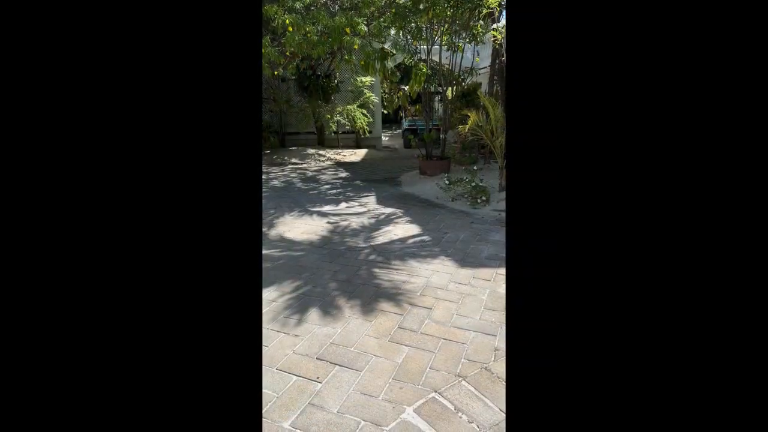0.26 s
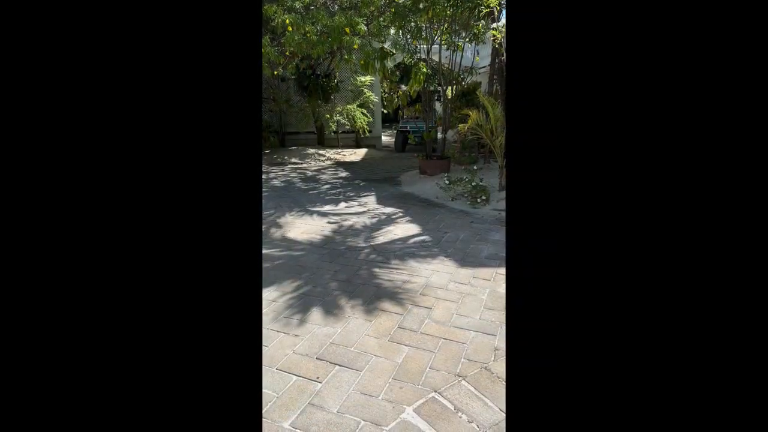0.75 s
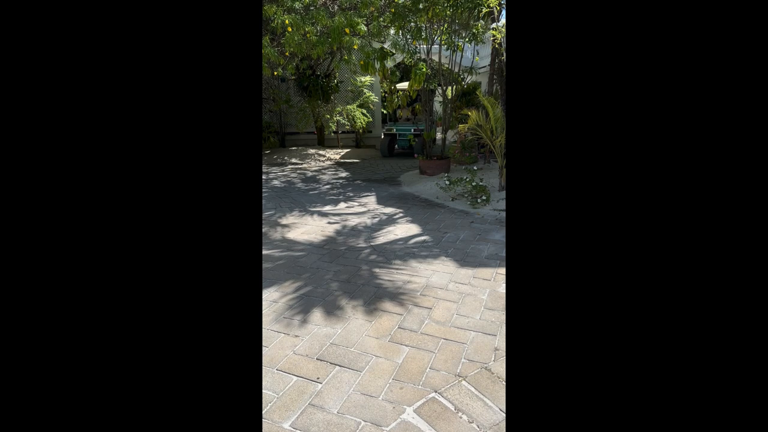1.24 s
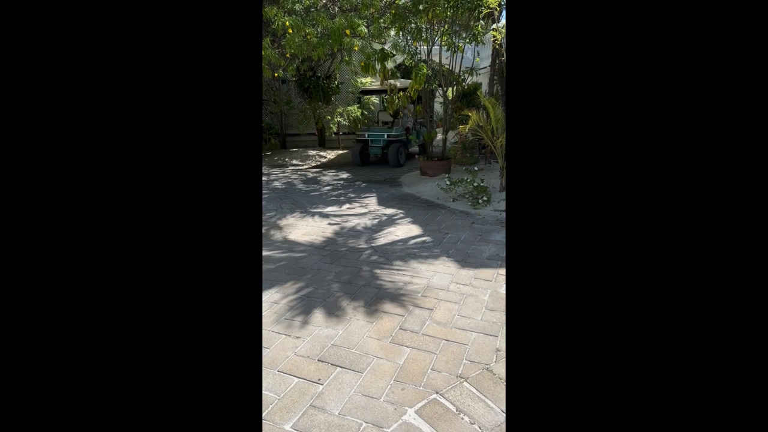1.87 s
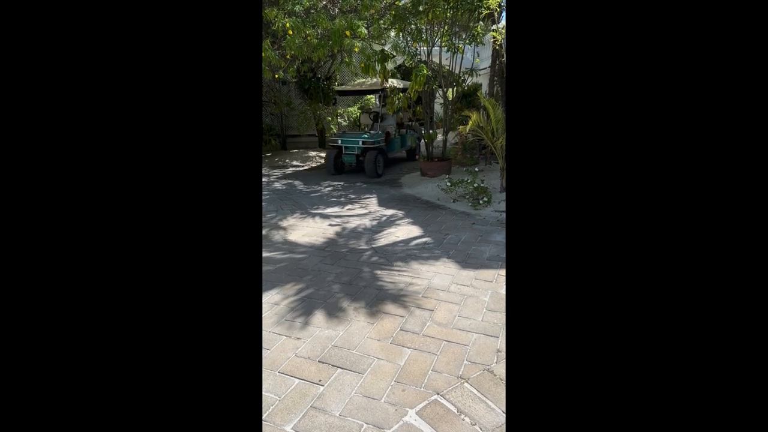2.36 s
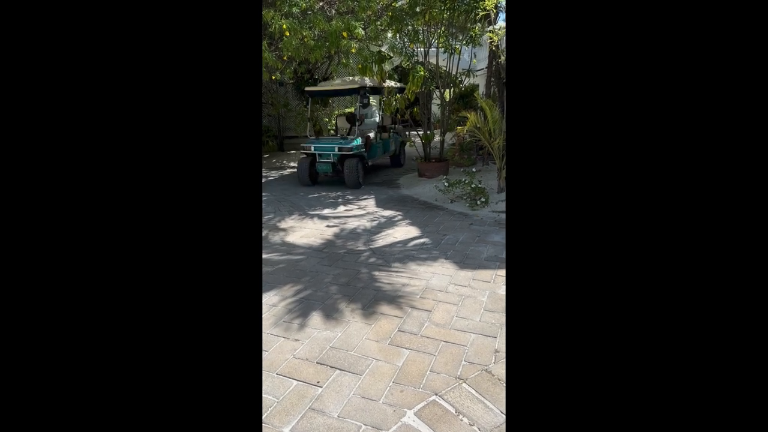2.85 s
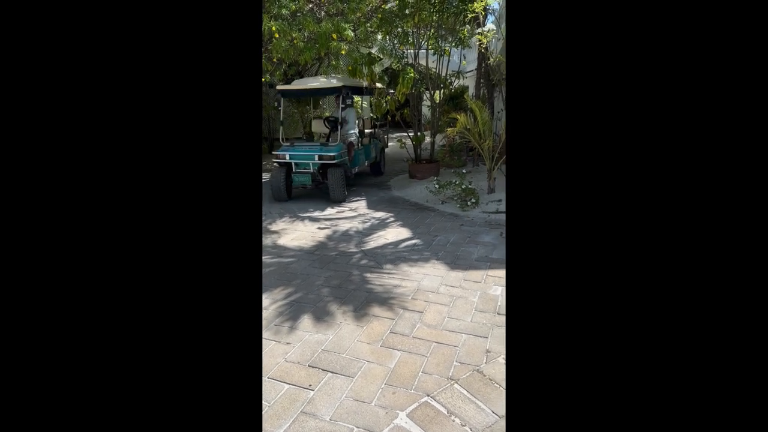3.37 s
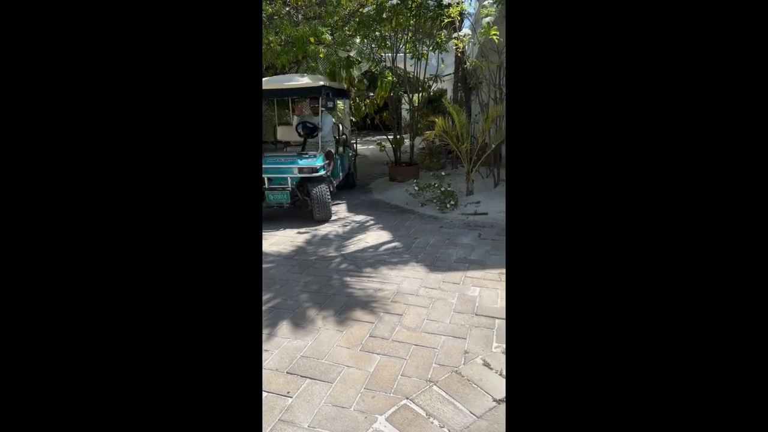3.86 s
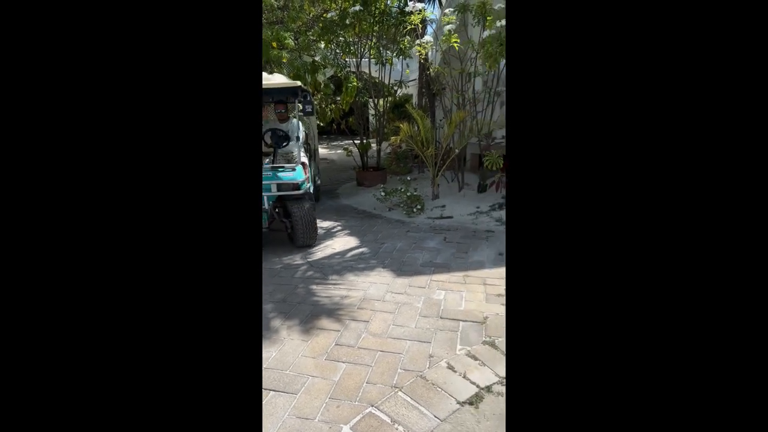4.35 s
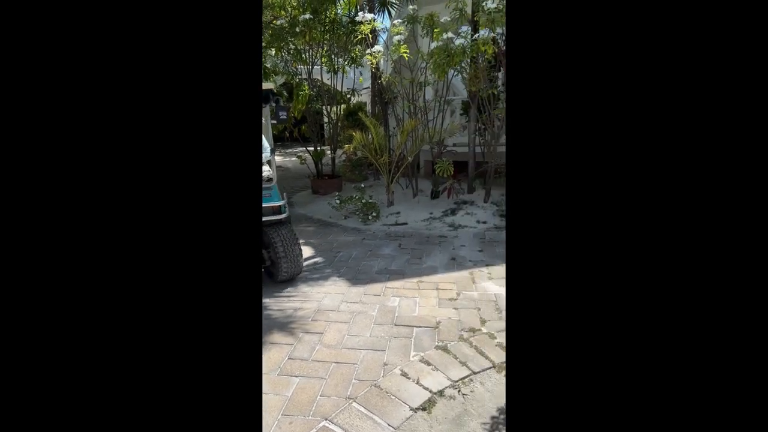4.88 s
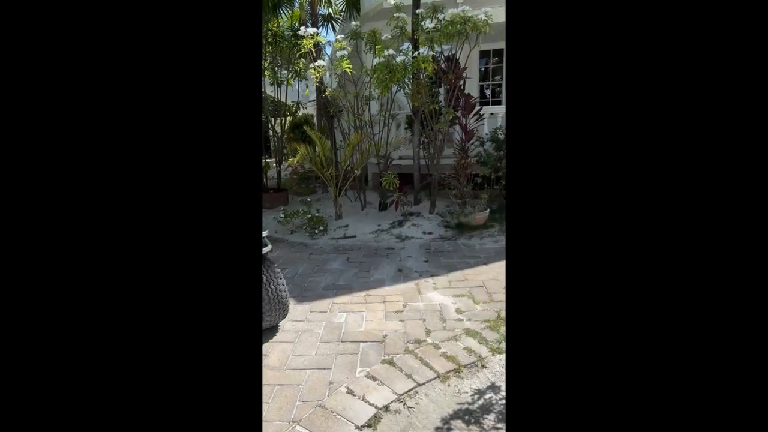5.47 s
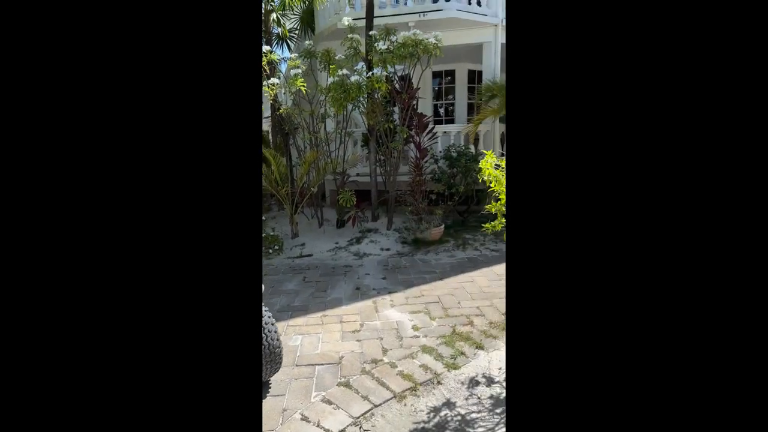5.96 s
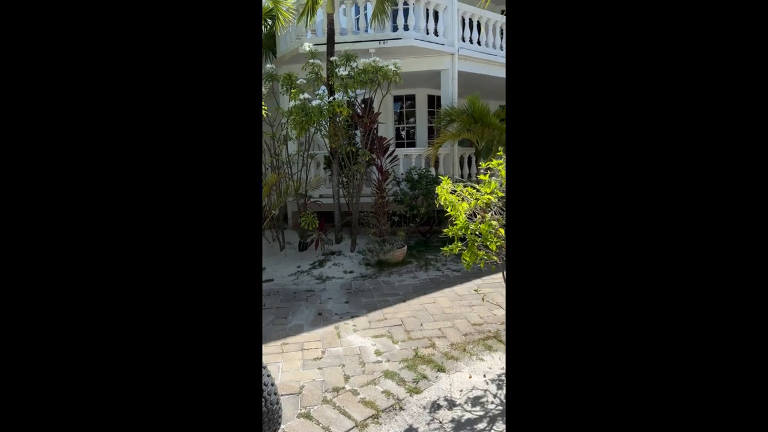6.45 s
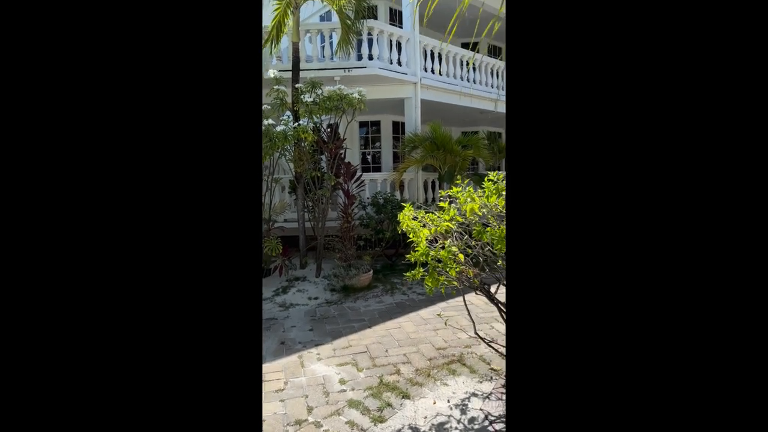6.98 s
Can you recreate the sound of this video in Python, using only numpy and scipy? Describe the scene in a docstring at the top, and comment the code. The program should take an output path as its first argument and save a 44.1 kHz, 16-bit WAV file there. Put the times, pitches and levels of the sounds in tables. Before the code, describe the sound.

A small one-cylinder petrol cart putters up over paving, passes close on the left, then slows to a lumpy, clattering chug as wind buffets the microphone.

```python
"""Petrol cart passing and slowing

A small cart with a one-cylinder petrol engine rolls up over paving, passes close on the left and slows down.
Each engine cycle rings exhaust modes as a thump, then shapes noise into a rasping puff of gas and clatter.
Struck modes give valves, cylinder head and panels; coloured noise gives the whirr of tyres and fan.
A belt whistles near the end, and low noise and wobbling swings are gusts of wind on two microphone ports."""
import sys
import numpy as np
from scipy import signal
from scipy.fft import rfft, irfft
from scipy.io import wavfile
from scipy.ndimage import uniform_filter1d

SR = 44100
rng = np.random.default_rng(int(sys.argv[2]) if len(sys.argv) > 2 else 0)


def file_out(sig):
    """Save sig as 16-bit WAV at sys.argv[1]."""
    # one column per channel
    cols = np.atleast_2d(sig).T
    # limit, then scale
    lim = np.clip(cols, -1, 1)
    pcm = np.round(lim * 32767).astype(np.int16)
    wavfile.write(sys.argv[1], SR, pcm)


N = 318402

# Engine speed. Each row: time in seconds, speed in cycles per second.
SPEED = [(0, 15.61), (.5, 16.58), (1.16, 14.9), (1.43, 16.11), (2.05, 17.13), (2.5, 15.53), (2.96, 13.93),
         (3.55, 15.49), (3.95, 14.37), (4.4, 12.58), (4.85, 11.13), (5.4, 9.3), (5.85, 8.5), (6.2, 7.56),
         (6.6, 6.28), (7.22, 4.05)]
# Gusts. Each row: peak time in seconds, deep buffet in dB, quicker flutter in dB,
# half length in seconds, pitch of the buffet in Hz before a slow wobble of its phase.
GUSTS = [(0.0, -33, -53, 0.043, 70), (0.901, -35, -50, 0.029, 70), (0.999, -24, -42, 0.041, 70),
         (2.212, -32, -47, 0.03, 70), (2.785, -33.5, -50, .025, 75), (3.599, -25, -31.5, 0.04, 48),
         (4.017, -21.5, -41, 0.032, 65), (4.075, -25, -26, 0.021, 75), (4.145, -25, -31, 0.039, 55),
         (4.27, -24, -29, 0.048, 55.3), (4.412, -33, -29.5, .03, 55), (4.501, -26, -30, 0.031, 75),
         (4.614, -22, -30.5, 0.044, 97), (4.801, -24, -26.5, 0.032, 58), (4.894, -23, -26, 0.027, 60),
         (4.996, -31, -30, 0.022, 75), (5.064, -22.5, -37, 0.025, 66), (5.16, -37, -34, .03, 60)]
GUST_EDGE_DB = 9   # fall at half a length from the peak


def from_db(db):
    """Amplitude gain is ten to the power of a twentieth of the decibels."""
    return 10 ** (np.asarray(db) / 20)


def rms_one(x):
    """Dividing by the root mean square gives unit power."""
    return x / np.sqrt(np.mean(x ** 2) + 1e-20)


def in_time(rows):
    """Linear interpolation turns each column of a time table into a curve, sample by sample."""
    s, *columns = np.transpose(rows)
    return [np.interp(np.arange(N) / SR, s, column) for column in columns]


def at_hz(points):
    """A spectrum table is read at every FFT bin, linearly over log frequency."""
    table_hz, values = np.array(points).T
    hz = np.maximum(np.arange(N // 2 + 1) * SR / N, 1)
    return np.interp(np.log(hz), np.log(np.maximum(table_hz, 1)), values)


def white():
    """Three independent draws of white noise, whose power is even over frequency."""
    return rng.standard_normal(size=(3, N))


def drift(corner_hz):
    """Slow chance: noise through two one-pole low-passes, drawn every 40 samples; spread 1."""
    r = np.exp(-80 * np.pi * corner_hz / SR)
    coarse = rng.standard_normal(N // 40 + 2002)
    slow = signal.lfilter([1], [1, -2 * r, r * r], coarse)[2000:]   # the filter's run-in is dropped
    return np.interp(np.arange(N) / 40, np.arange(len(slow)), rms_one(slow))


def clatter(spread_db):
    """Fast random modulation of white noise makes dense grit of uneven size."""
    return white() * from_db(spread_db * drift(156))


def follow(rule, levels_db):
    """Coupled levels: a mean in dB plus shares of the swings of other levels."""
    mean_db, *shares = rule
    return mean_db + sum(share * (db - db.mean()) for share, db in zip(shares, levels_db))


def at_ports(excite, spectrum, peaks=()):
    """Partial coherence: one coloured draw reaches both ports with a phase gap, two reach one port each."""
    # Phase between the ports. Each row: frequency in Hz, lead of the left in radians.
    port_phase = [(0, 0), (860, -1.2), (2070, 0.6), (2670, 2.9), (3100, 2.2), (5510, -3.9), (7670, -0.3),
                  (8790, 0.5), (9730, 3.0), (10900, 3.3), (11800, 6.1), (13000, 6.4), (14500, 9.4),
                  (15400, 9.6)]
    # Coherence of the ports. Each row: frequency in Hz, share of power common to both.
    common = [(30, .98), (60, .94), (250, .8), (600, .9), (1200, .93), (2500, .65), (5000, .6), (8000, .92),
              (15000, .92)]
    hz, gain_db = np.arange(N // 2 + 1) * SR / N, at_hz(spectrum)
    for centre_hz, width_hz, level_db in peaks:
        gain_db = gain_db + level_db / (1 + (2 * (hz - centre_hz) / width_hz) ** 2)
    both, left, right = rfft(excite) * from_db(gain_db)
    half_turn = np.exp(.5j * np.interp(hz, *np.transpose(port_phase)))
    share = np.clip(at_hz(common), 0, 1)
    shared = np.sqrt(share) * both * [half_turn, 1 / half_turn]
    own = np.sqrt(1 - share) * np.array([left, right])
    return rms_one(irfft(shared + own, N))


def resonate(x, hz, width_hz):
    """A two-pole resonance passes a band whose width is set by its damping; rms 1."""
    r = np.exp(-np.pi * width_hz / SR)
    return rms_one(signal.lfilter([1, 0, -1], [1, -2 * r * np.cos(2 * np.pi * hz / SR), r * r], x))


def blows(starts, lag):
    """Periodic excitation: one click a cycle at a share of the cycle, with slight timing jitter."""
    count = np.arange(len(starts))
    at_s = np.interp(count + lag, count, starts) + rng.normal(0, 0.00036, len(starts))
    return np.clip(at_s * SR + SR, 0, N + SR).astype(int)   # one second of run-in


def struck(at, modes, band_hz, uneven_db):
    """Modal ringing: each blow sets off decaying sines of uneven strength; loudness is evened over 0.5 s."""
    out = 0
    for k, (hz, level_db, t60_s) in enumerate(modes):
        kicks = np.zeros(N + SR + 1) + 1e-18
        sign = (-1) ** k   # neighbouring modes swing opposite ways
        kicks[at] = sign * from_db(level_db + rng.normal(0, uneven_db, len(at)))
        r, w = from_db(-60 / (t60_s * SR)), 2 * np.pi * hz / SR
        out = out + signal.lfilter([0, np.sin(w)], [1, -2 * r * np.cos(w), r * r], kicks)
    band = signal.butter(2, band_hz, "band", fs=SR, output="sos")
    out = signal.sosfilt(band, out)[SR:SR + N]
    return out / np.sqrt(uniform_filter1d(out ** 2, size=SR // 2) + 1e-12)


def cycle_starts():
    """Phase is the integral of speed: each whole turn starts a cycle, from before to after the scene."""
    first_puff_s = -0.0206
    s = np.arange(-SR // 2, N + SR) / SR
    turns = np.cumsum(np.interp(s, *np.transpose(SPEED))) / SR
    turns = turns - np.interp(first_puff_s, s, turns)
    return np.interp(np.arange(np.ceil(turns[0]), turns[-1]), turns, s)


def exhaust(starts, pipe_db, boom_db, speed):
    """Pipe and can resonance: the opening valve rings the pipe; the silencer answers with a second surge."""
    # Modes of the exhaust pipe, the silencer can and a low boom.
    # Each row: frequency in Hz, relative level in dB, 60 dB decay time in seconds.
    pipe_modes = [(70, -8, 0.13), (103.6, 5.5, 0.14), (143, -7.5, 0.035), (169.5, 0, 0.18)]
    can_modes = [(194.4, 2.5, 0.08), (246.5, -9, 0.077)]
    boom_modes = [(134.3, 0, 0.26)]
    # Can ring swelling and sinking with the load. Each row: time in seconds, level in dB.
    can_levels = [(0, -51), (.66, -45), (1.05, -51), (1.18, -38), (1.27, -42), (1.4, -34.5), (1.55, -38),
                  (1.65, -44), (1.82, -37), (2.05, -36), (2.19, -47), (2.87, -48.5), (2.94, -32.5),
                  (3.01, -50), (3.08, -31), (3.15, -40.5), (3.28, -30), (3.43, -30.5), (3.62, -37),
                  (3.69, -34.5), (3.84, -42.5), (4.6, -51), (4.89, -36.5), (5.15, -38), (5.45, -48),
                  (6, -42), (6.3, -46), (6.9, -41.5), (7.22, -51)]
    lead, lead_s = .185, .0027   # the valve opens a share of a cycle plus a fixed time before the puff
    surge_lag_s = 0.01541
    surge_db = 1.5 - 13 * np.maximum(8.9 - speed, 0)   # loses 13 dB per cycle/s under 8.9 cycles/s
    opens = blows(starts - lead_s, -lead)
    pipe = struck(opens, pipe_modes, band_hz=[65, 235], uneven_db=0.94)
    boom = struck(opens, boom_modes, band_hz=[90, 200], uneven_db=1.5)
    can = struck(opens, can_modes, band_hz=[130, 280], uneven_db=1.5)
    surge = from_db(surge_db) * np.roll(can, int(surge_lag_s * SR))
    can = (can + surge) / np.sqrt(1 + from_db(2 * surge_db))
    can_db, = in_time(can_levels)
    return from_db(pipe_db) * pipe + from_db(boom_db) * boom - from_db(can_db) * can


def house_walls(note):
    """Reflection: the house walls return the exhaust note, later and weaker (left, right)."""
    lags_s, levels_db = (0.02104, 0.01292), (-16, -10)
    return np.array([from_db(db) * np.roll(note, int(lag_s * SR)) for lag_s, db in zip(lags_s, levels_db)])


def puff(starts, column, depth, uneven_db):
    """Amplitude modulation: gain over the cycle, uneven from one to the next, power evened over 0.5 s."""
    # Gas and casing level over one cycle, at speed and when the engine labours slowly
    # (there the second stroke is short and comes earlier).
    # Each row: share of the cycle, then relative rasp, hiss and casing in dB before the depth factor.
    quick_cycle = [(0, -5, -8, -18), (.03, -10.5, -2, -11), (.07, 1, -4.5, 5), (.12, -1.5, 1.5, 4),
                   (.18, -4, 0, 1), (.25, -3, -4.5, -20), (.31, -0.5, -2, -3.5), (.37, -2, -6.5, -3),
                   (.45, -3.5, -5.5, 3.5), (.56, -9, -9.5, -7.5), (.8, -10.5, -12, -7.5),
                   (1, -9.5, -8, -26)]
    slow_cycle = [(0, -6, -5, -10), (.05, -2, -1.5, -3), (.11, 1.5, 1.5, 3), (.17, -1, 0, 1),
                  (.26, -8, -6, -12), (.33, 0.5, -1.5, 2), (.39, -5, -4, -5), (.5, -7, -6, -5),
                  (.75, -10, -8, -9), (1, -8, -6, -12)]
    slow_full, slow_from = 7.4, 9.2   # cycles/s between which one shape gives way to the other
    turns = np.interp(np.arange(N) / SR, starts, np.arange(len(starts)))
    quick_db, slow_db = [np.interp(turns % 1, np.array(rows)[:, 0], np.array(rows)[:, column])
                         for rows in (quick_cycle, slow_cycle)]
    slowed = np.interp(in_time(SPEED)[0], [slow_full, slow_from], [1, 0])
    shape_db = quick_db + slowed * (slow_db - quick_db)
    strength_db = rng.normal(0, uneven_db, len(starts))[turns.astype(int)]
    strength_db = strength_db * np.sin(np.pi * (turns % 1))   # no jump between cycles
    gain = from_db(np.clip(depth, 0, 2) * shape_db + strength_db)
    return gain / np.sqrt(uniform_filter1d(gain ** 2, size=SR // 2))


def growl(shake, knocks, cart_db):
    """Modulated low noise, joined by frame modes that each firing excites."""
    # Growl spectrum. Each row: frequency in Hz, relative density in dB per Hz.
    growl_colour = [(180, -3.5), (280, 1), (380, -2.5), (500, -1.5), (620, -1), (750, -3.5), (1000, -59)]
    # Resonances on it. Each row: frequency in Hz, width in Hz, added level in dB.
    growl_peaks = [(453, 45, 3.8), (540, 46, 3.2)]
    # Growl level: mean in dB, then shares of the swings of rasp, airy top and casing.
    growl_rule = (-45.3, 0.75, 0.4, -0.1263)
    # Frame modes. Each row: frequency in Hz, relative level in dB, 60 dB decay time in seconds.
    frame_modes = [(430, -1.5, .12), (485, -0.5, .12)]
    level = from_db(follow(growl_rule, cart_db))
    gas = at_ports(shake ** 0.42 * clatter(1.5), growl_colour, growl_peaks)
    frame = struck(knocks, frame_modes, band_hz=[200, 800], uneven_db=1.5)
    return level * (gas + from_db(-8) * frame)


def rasp(shake, level_db):
    """Gas turbulence: coarse noise gated by the puff and coloured around 750 Hz."""
    # Rasp spectrum. Each row: frequency in Hz, relative density in dB per Hz.
    rasp_colour = [(450, -47), (620, -1), (750, 0), (900, -2.5), (1250, -1.5), (1450, -11.5), (1800, -71)]
    # Resonance on it. Each row: frequency in Hz, width in Hz, added level in dB.
    rasp_peaks = [(775, 22, 8.5)]
    return from_db(level_db) * at_ports(shake * clatter(1.1), rasp_colour, rasp_peaks)


def hiss(gas, loose, cart_db):
    """Jet noise modulated by the puff, with a higher rattle from a more uneven modulation."""
    # Spectra of hiss and rattle. Each row: frequency in Hz, relative density in dB per Hz.
    hiss_colour = [(1150, -19), (1450, -2), (2000, -1), (2300, -6.5), (2900, -3), (3400, -17), (4000, -33)]
    rattle_colour = [(2500, -34), (3200, 6), (4000, 3), (5300, -0.5), (6300, -16), (8000, -14)]
    # Resonances on them. Each row: frequency in Hz, width in Hz, added level in dB.
    hiss_peaks = [(1560, 17, 4.7), (1934, 210, 4), (2580, 240, 2.5)]
    rattle_peaks = [(3740, 70, 5.5), (4180, 70, 6), (5170, 830, 9.9)]
    # Hiss level: mean in dB, then shares of the swings of rasp, airy top and casing.
    hiss_rule = (-45.5, 0.12, 0.31, 0.13)
    jet = at_ports(gas * clatter(0.66), hiss_colour, hiss_peaks)
    rattle = at_ports(loose ** 0.9 * clatter(1.4), rattle_colour, rattle_peaks)
    return from_db(follow(hiss_rule, cart_db)) * (jet + from_db(-5.0) * rattle)


def airy_top(gas, level_db):
    """High-frequency turbulence, modulated slightly less deeply than the hiss."""
    # Treble spectrum. Each row: frequency in Hz, relative density in dB per Hz.
    top_colour = [(4500, -55), (6000, -3), (8000, -1), (10000, -9), (12500, -13), (14000, -8.5),
                  (15600, -5)]
    return from_db(level_db) * at_ports(gas ** 0.89 * clatter(1.7), top_colour)


def casing(ringing, level_db):
    """Forced resonance: modulated grit through the narrow peaks of the engine casing."""
    # Casing spectrum. Each row: frequency in Hz, relative density in dB per Hz.
    casing_colour = [(600, -32), (750, -11.5), (1200, -22), (2100, -18.5), (2300, -52), (5000, -47),
                     (6000, -70)]
    # Resonances on it. Each row: frequency in Hz, width in Hz, added level in dB.
    casing_peaks = [(775, 48, 11.5), (842.4, 45, 17), (1627, 34, 11.7), (1944, 58, 17.5), (4300, 100, 6)]
    return from_db(level_db) * at_ports(ringing * clatter(3.9), casing_colour, casing_peaks)


def knock(knocks, cart_db, cover_db):
    """Impact excitation: every cycle strikes the modes of the cylinder head and a cover."""
    # Modes of head and cover.
    # Each row: frequency in Hz, relative level in dB, 60 dB decay time in seconds.
    head_modes = [(1100, 4.5, 0.018), (1230, -2.5, 0.09), (840, -9, 0.04), (2270, -16, 0.016),
                  (4090, -20, 0.019)]
    cover_modes = [(831, -2, 0.093), (1566, -4, 0.073), (1960, -2, 0.072)]
    # Head level: mean in dB, then shares of the swings of rasp, airy top and casing.
    knock_rule = (-53, 2.2, -0.1, -0.16)
    head = struck(knocks, head_modes, band_hz=[500, 5000], uneven_db=2.5)
    cover = struck(knocks, cover_modes, band_hz=[500, 3000], uneven_db=2.5)
    return from_db(follow(knock_rule, cart_db)) * head + from_db(cover_db) * cover


def seating(starts):
    """Impact and rebound: the valve clacks onto its seat and bounces once."""
    # Modes struck. Each row: frequency in Hz, relative level in dB, 60 dB decay time in seconds.
    seat_modes = [(788, 1, 0.042), (666, -7.5, 0.06), (986, -5.5, 0.074), (1310, -12, 0.041),
                  (1967, -16, .05), (4350, -18, 0.018)]
    lag, lag_s = .17, .027   # a share of a cycle plus a mean fixed time into the puff
    bounce_s, bounce_db = .013, -4
    late = ((lag_s + rng.normal(0, 0.00198, len(starts))) * SR).astype(int)
    at = np.minimum(blows(starts, lag) + late, N + SR)
    clack = struck(at, seat_modes, band_hz=[400, 6000], uneven_db=3.5)
    return rms_one(clack + from_db(bounce_db) * np.roll(clack, int(bounce_s * SR)))


def valve_gear(starts, cart_db):
    """Modal impact: a sharp tick each cycle, its colour varied by uneven mode strengths."""
    # Valve gear modes. Each row: frequency in Hz, relative level in dB, 60 dB decay time in seconds.
    tappet_modes = [(2704, 10.5, 0.067), (2940, -2, 0.055), (3410, -1, 0.05), (3780, -3.5, 0.035),
                    (4100, -0.5, 0.06), (4620, -0.5, 0.027), (5060, -3, 0.027)]
    # Tick level: mean in dB, then shares of the swings of rasp, airy top and casing.
    tick_rule = (-63.5, 0.4, 1.32, 0.06)
    tick = struck(blows(starts, .09), tappet_modes, band_hz=[2000, 7000], uneven_db=4.5)
    return from_db(follow(tick_rule, cart_db)) * tick


def bodywork(shake, knocks, panels_db, speed, ticks):
    """Sympathetic resonance: knock and puff shake the panels; drive whine and valve ticks join them."""
    # Panels that ring on with each puff. Each row: frequency in Hz, width in Hz.
    panels = [(340, 31), (600, 92), (990, 110), (1215, 43), (1660, 54), (1930, 150)]
    # Drive whines between the puffs. Each row: frequency in Hz, width in Hz, relative level in dB.
    whines = [(2000, 60, 2.5), (4170, 130, -13)]
    grit, kicks = clatter(2.0), np.zeros(N + SR + 1)
    kicks[knocks] = from_db(rng.normal(0, 2.5, len(knocks)))
    shaken = shake * grit + from_db(-8) * rms_one(kicks[SR:SR + N])
    cycle = np.searchsorted(knocks - SR, np.arange(N) + SR // 100)
    favour_db = rng.normal(0, 2.2, size=(len(knocks) + 1, len(panels)))   # each cycle favours other panels
    favour = from_db(favour_db)[cycle].T
    hum = ticks
    for panel, level_db, gain in zip(panels, panels_db, favour):
        hum = hum + from_db(level_db) * resonate(shaken * gain, *panel)
    # the whine loses 3 dB per cycle/s above 7.2 cycles/s
    whine_db = -55 - 3 * np.maximum(speed - 7.2, 0) + 1.3 * drift(12)
    for hz, width_hz, level_db in whines:
        tone = resonate(resonate(grit, hz, width_hz), hz, width_hz)
        hum = hum + from_db(whine_db + level_db) * tone
    return np.std(hum) * at_ports(hum, [(100, 0), (200, 0)])   # flat colour


def whistle():
    """Frequency modulation: random wavering roughens a tone from the belt slipping as the drive slows."""
    # Belt whistle. Each row: time in seconds, mean frequency in Hz, level in dB before waver and side gain.
    belt = [(6.7, 5450, -84), (6.77, 5450, -64), (6.83, 5450, -69), (6.91, 5440, -61), (6.97, 5440, -76),
            (7.02, 5440, -74), (7.05, 5450, -63), (7.17, 5480, -65), (7.22, 5480, -82)]
    hz, level_db = in_time(belt)
    fade = np.clip((np.arange(N) / SR - belt[0][0]) / .05, 0, 1)
    tone = np.sin(2 * np.pi * np.cumsum(hz + 40 * drift(120)) / SR)
    level = from_db(level_db + 4.9 * drift(30))
    return np.sqrt(2) * fade * level * tone * [[1.2], [.6]]   # left, right


def whirr(cart_db):
    """Broadband rolling and fan noise: steady noise under a slowly drifting level."""
    # Whirr of tyres and fan. Each row: frequency in Hz, relative density in dB per Hz.
    whirr_colour = [(40, -14), (100, -1.5), (200, 3.5), (350, -8), (700, -16.5), (1300, -15.5),
                    (2000, -21.5), (4000, -24.5), (8000, -31.5), (15500, -36)]
    # Whirr level: mean in dB, then shares of the swings of rasp, airy top and casing.
    whirr_rule = (-41, 0.33, -0.14, 0.1531)
    return from_db(follow(whirr_rule, cart_db) + 0.86 * drift(8.1)) * at_ports(white(), whirr_colour)


def wind():
    """Wind turbulence at the ports: deep buffeting with a flutter that grows faster than the breeze."""
    # Breeze on the ports. Each row: time in seconds, level in dB before its random drift.
    breeze = [(0, -47), (.4, -40.5), (.85, -36), (1.15, -40), (2, -44.5), (3.4, -43.5), (3.7, -38),
              (3.93, -35.5), (4.1, -32.5), (4.95, -33.5), (5.2, -37), (5.7, -52), (7.22, -52)]
    # Deep rumble and higher flutter. Each row: frequency in Hz, relative density in dB per Hz.
    wind_colour = [(15, -36), (30, -8.5), (45, 0), (65, 4.5), (85, -1.5), (120, -17), (250, -24),
                   (600, -71)]
    flutter_colour = [(50, -11), (80, -3), (100, 0), (130, 2.5), (180, -15.5), (300, -23), (600, -60)]
    breeze_db = in_time(breeze)[0] + 3.2 * drift(8.1)
    # before its own drift the flutter is -36.5 dB at a breeze of -33 dB
    flutter_db = -36.5 + 1.17 * (breeze_db + 33.0) + 2.4 * drift(4.6)
    flutter = eddies(flutter_colour, gusty(flutter_db, column=2))
    return eddies(wind_colour, breeze_db) + buffets() + flutter


def eddies(spectrum, level_db):
    """Turbulent pressure: low noise, its own lumps partly levelled over 40 ms, follows the given level."""
    rumble = at_ports(white(), spectrum)
    lumps = uniform_filter1d(np.mean(rumble ** 2, axis=0), size=SR // 25)
    return from_db(level_db) * rumble / (lumps + 0.073) ** 0.45


def gusty(calm_db, column):
    """Powers add: each gust swells and dies on top of the calm level; the sum is in dB."""
    s, power = np.arange(N) / SR, from_db(2 * calm_db)
    for row in GUSTS:
        swell_db = row[column] - GUST_EDGE_DB * ((s - row[0]) / row[3]) ** 2
        power = power + from_db(2 * np.maximum(swell_db, -120))
    return 10 * np.log10(power)


def buffets():
    """Enveloped oscillation: each gust rocks both ports with a few wobbling low swings."""
    s, wobble, out = np.arange(N) / SR, 0.5 * drift(14.5), 0
    chances = rng.uniform(-1.03, 1, size=(len(GUSTS), 2))
    for (at, level_db, _, half_s, hz), (start, skew) in zip(GUSTS, chances):
        swell = from_db(np.maximum(level_db - GUST_EDGE_DB * ((s - at) / half_s) ** 2, -120))
        port_gap = 0.35 * skew * np.array([[1], [-1]])   # radians, opposite at the two ports
        out = out + swell * np.sin(2 * np.pi * hz * (s - at) + wobble + np.pi * start + port_gap)
    return np.sqrt(2) * out


def scene():
    """Superposition: the engine on the left, whirr around it, wind on the ports."""
    # The cart as it passes, before any side gain.
    # Each row: time in seconds, then rasp, airy top and casing ring in dB.
    cart = [(0, -44, -59.5, -67), (.9, -46, -59, -69), (1.3, -43.5, -58.5, -63), (1.5, -43, -53.5, -65),
            (1.8, -41, -56, -67), (2.1, -42, -52.5, -67), (2.45, -41, -55, -59), (2.75, -40.5, -53, -53),
            (3.3, -40, -48, -56), (3.6, -39, -51.5, -53), (3.95, -37, -52.5, -49), (4.5, -38, -56.5, -48.5),
            (4.85, -39.5, -56, -44.5), (5.15, -42, -55.5, -45), (5.45, -41.5, -55.5, -41.5),
            (6, -44, -56, -45.5), (6.3, -45, -53.5, -43), (6.9, -48.5, -56.5, -46.5), (7.22, -49, -58, -58)]
    # What faces the listener as the cart turns past.
    # Each row: time in seconds, then pipe, valve seating and each of the panels in dB.
    facing = [(0, -43.5, -63, -61, -51, -64, -60, -70, -73), (.7, -40.5, -62, -52, -57, -71, -62, -70, -68),
              (1.25, -40, -64, -60, -58, -57, -52, -61, -67),
              (1.7, -35.5, -49, -47.5, -63, -66, -59, -52, -55),
              (2.1, -39.5, -54, -57, -57, -60, -57, -53, -54),
              (2.6, -40, -62, -65, -49, -56, -47, -60, -61),
              (3.2, -36.5, -44.5, -56, -48, -49, -53, -71, -59),
              (3.7, -36.5, -55, -48, -46, -63, -48.5, -62, -49),
              (4.2, -35.5, -56, -60, -40, -60, -43.5, -69, -61),
              (4.55, -38, -49, -58, -44.5, -44.5, -44, -68, -66),
              (4.9, -38, -43, -58, -67, -40, -54, -55, -59),
              (5.2, -40, -47, -50, -53, -44.5, -64, -50, -50),
              (5.6, -42.5, -42, -53, -66, -48, -64, -66, -58),
              (6.2, -40, -46.5, -53, -66, -67, -65, -65, -66),
              (6.8, -36.5, -48, -55, -71, -52, -56, -61, -75),
              (7.22, -47, -50, -61, -64, -62, -66, -66, -69)]
    # Rings that come and go with the heading. Each row: time in seconds, low boom and struck cover in dB.
    rings = [(0, -49, -68), (.6, -43.5, -66), (1.2, -49, -64), (1.6, -40, -67), (2.0, -42, -64),
             (2.35, -49, -64), (2.7, -40, -65), (3.2, -42.5, -61), (4.0, -45.5, -56), (4.8, -46, -58),
             (5.3, -50, -51), (5.7, -48, -48), (6.3, -50, -47), (6.7, -50, -51), (7.22, -55, -58)]
    cart_db = rasp_db, top_db, casing_db = in_time(cart)
    pipe_db, seat_db, *panels_db = in_time(facing)
    boom_db, cover_db = in_time(rings)
    speed, = in_time(SPEED)
    starts = cycle_starts()
    knocks = blows(starts, .085)

    # left minus right in dB, before and after the listener turns away
    turn_s, turn_lasts_s = 5.07, 0.37
    pan_db = np.interp(np.arange(N) / SR, [turn_s, turn_s + turn_lasts_s], [4, 6.5])
    side = from_db(np.array([pan_db, -pan_db]) / 2)

    # the throb deepens as the casing comes close and the cycles lengthen
    depth = 0.44 + 0.05 * (casing_db - casing_db.mean()) + 2.1 / speed
    shake = puff(starts, column=1, depth=depth, uneven_db=0.5)
    gas = puff(starts, column=2, depth=depth, uneven_db=2.0)
    ringing = puff(starts, column=3, depth=depth, uneven_db=1.8)
    loose = puff(starts, column=2, depth=depth, uneven_db=2.5)

    note = exhaust(starts, pipe_db, boom_db, speed)
    low = house_walls(note) + note * side ** 0.49   # long waves bend round the listener
    puffs = side * (growl(shake, knocks, cart_db) + rasp(shake, rasp_db))
    treble = hiss(gas, loose, cart_db) + airy_top(gas, top_db)
    blows_heard = knock(knocks, cart_db, cover_db) + from_db(seat_db) * seating(starts)
    metal = side ** 0.43 * (casing(ringing, casing_db) + blows_heard)
    ticks = valve_gear(starts, cart_db)
    body = side ** 0.5 * bodywork(shake ** 1.56, knocks, panels_db, speed, ticks)
    return low + puffs + treble + metal + body + whistle() + whirr(cart_db) + wind()


def record(dry):
    """Band limiting: the microphone drops the deepest bass and the top is cut steeply."""
    low_hz, cutoff_hz = 35.6, 15650
    dry = signal.sosfilt(signal.butter(2, low_hz, "high", fs=SR, output="sos"), dry)
    return signal.sosfilt(signal.ellip(10, .5, 80, cutoff_hz, fs=SR, output="sos"), dry)


dry = scene()
out = record(dry)
file_out(out)
```